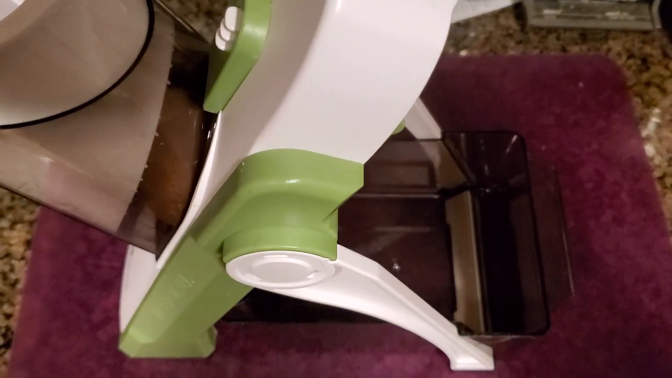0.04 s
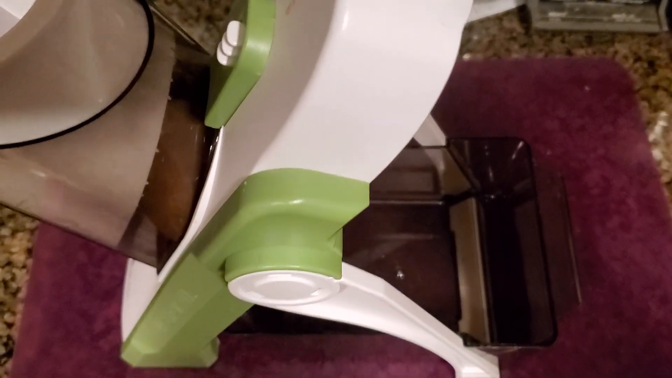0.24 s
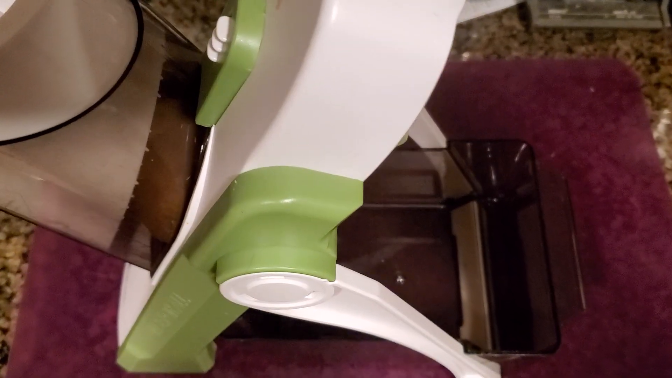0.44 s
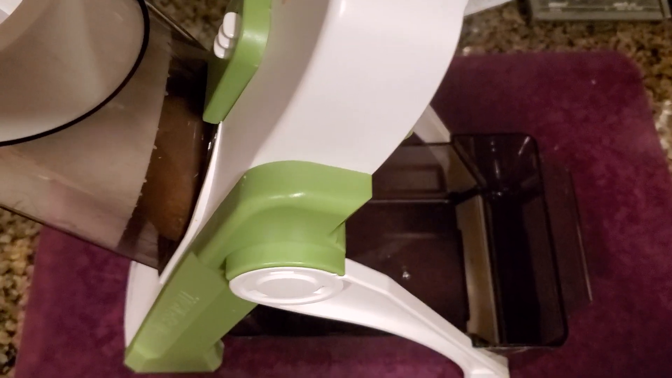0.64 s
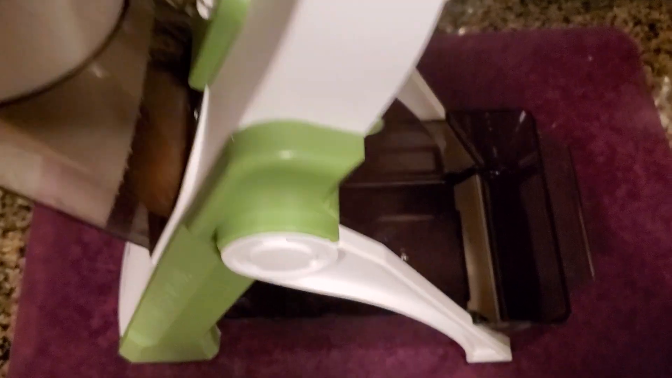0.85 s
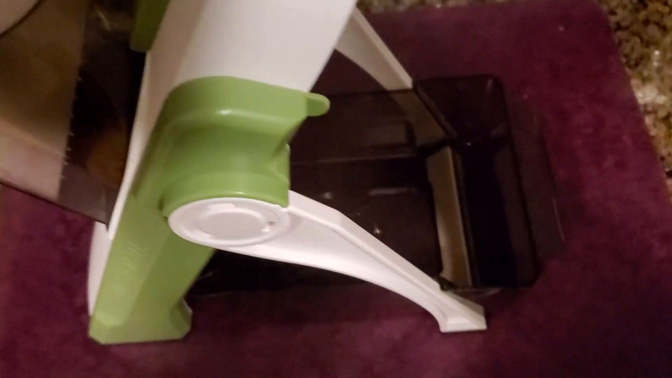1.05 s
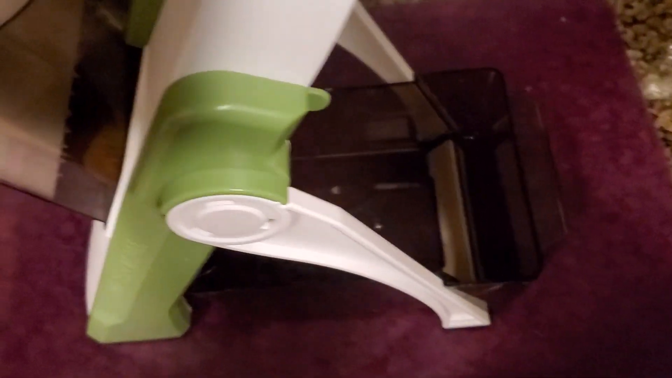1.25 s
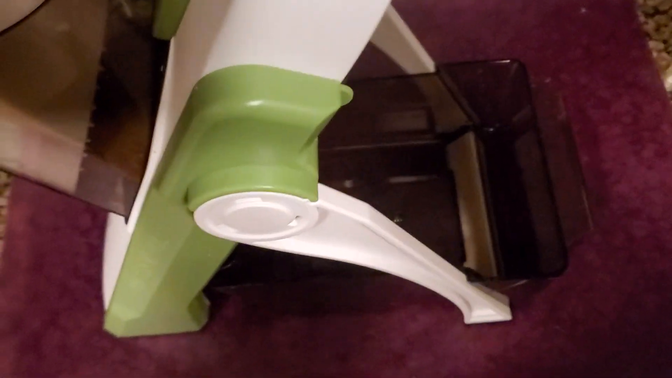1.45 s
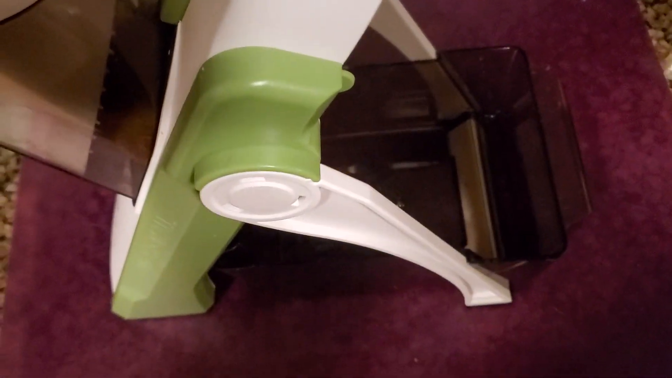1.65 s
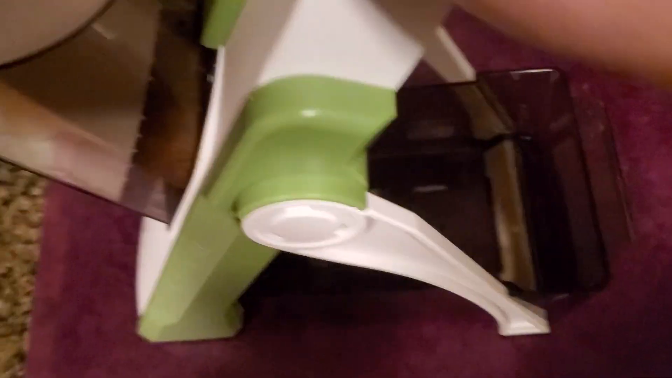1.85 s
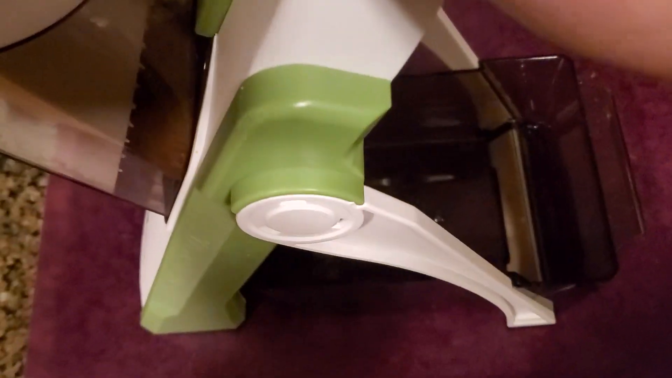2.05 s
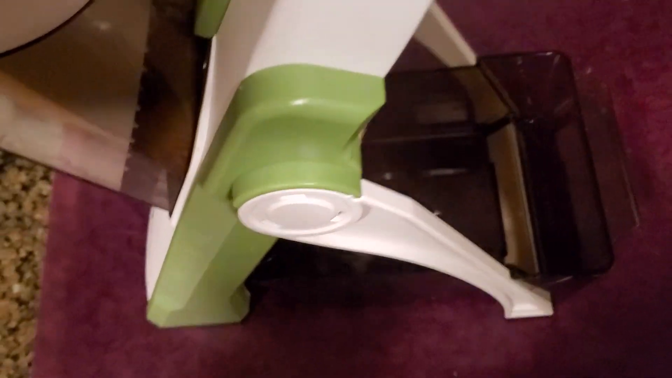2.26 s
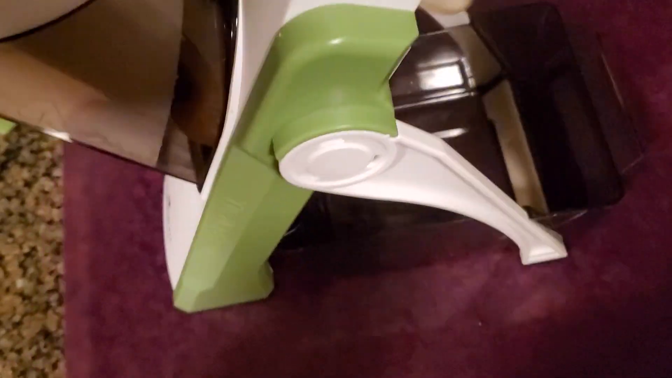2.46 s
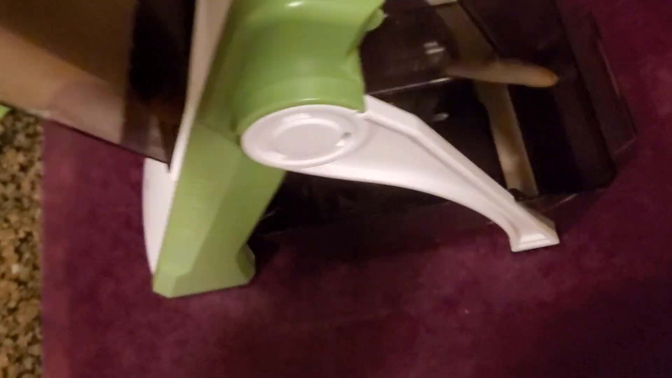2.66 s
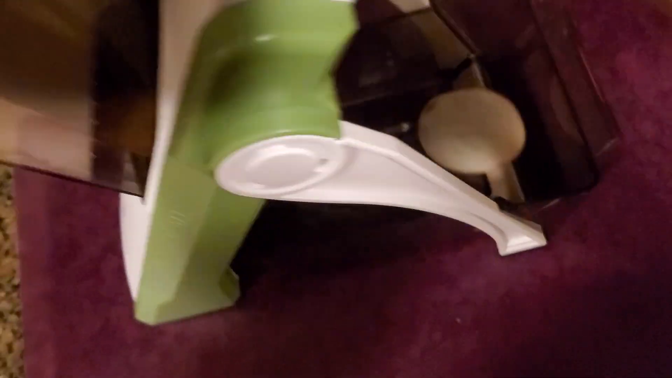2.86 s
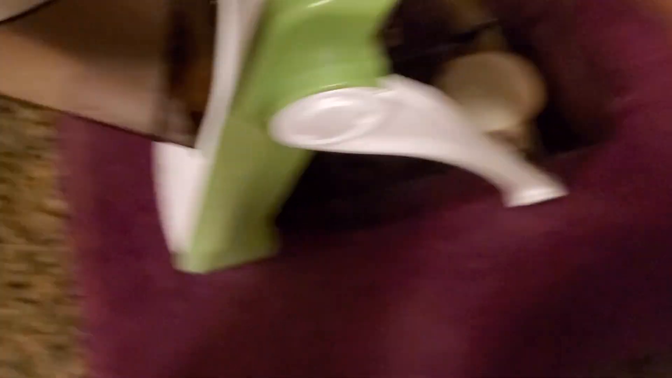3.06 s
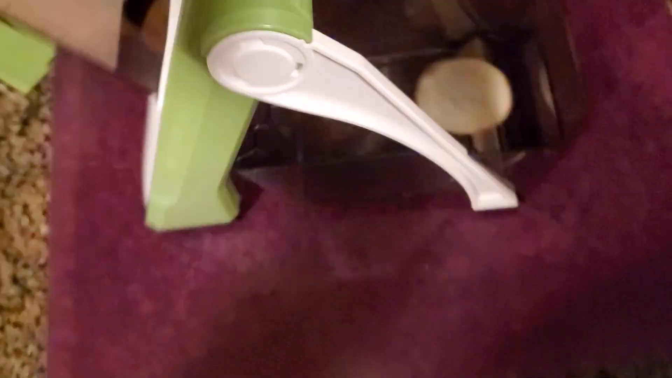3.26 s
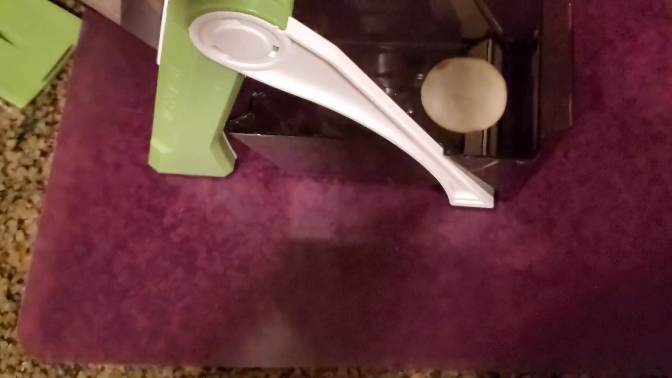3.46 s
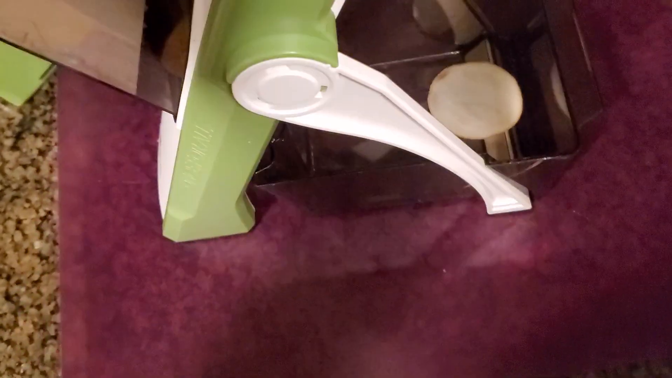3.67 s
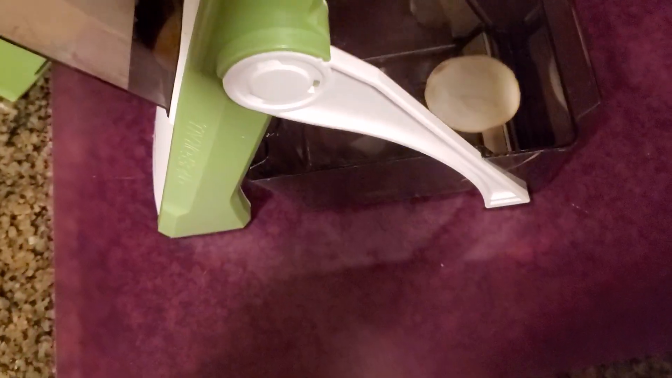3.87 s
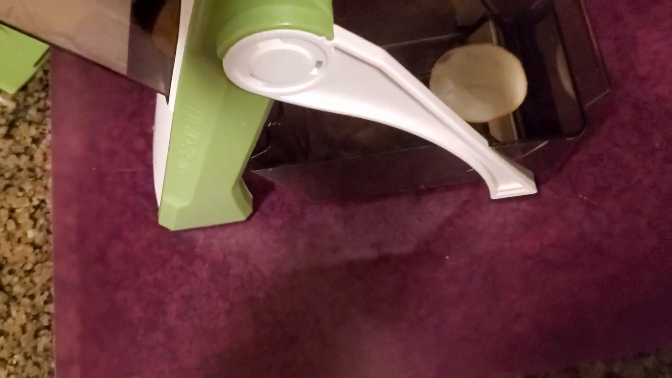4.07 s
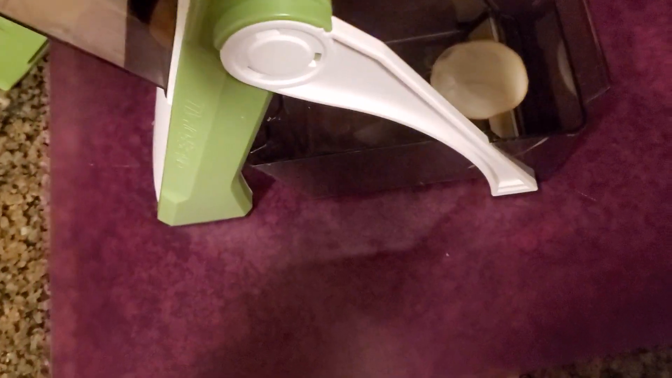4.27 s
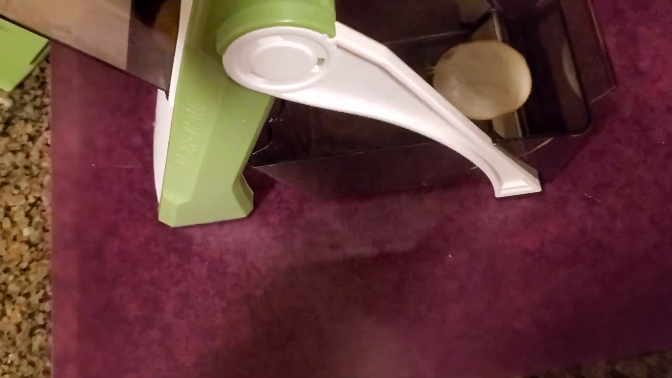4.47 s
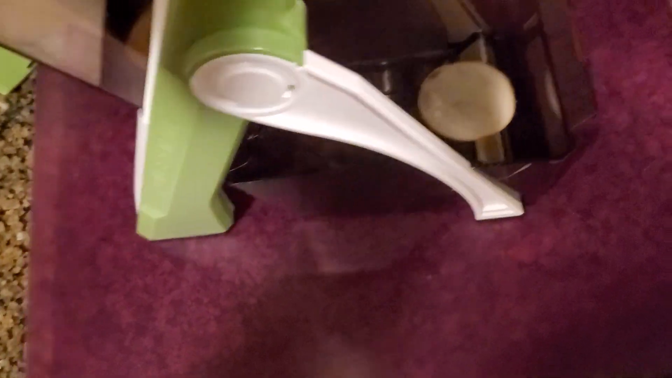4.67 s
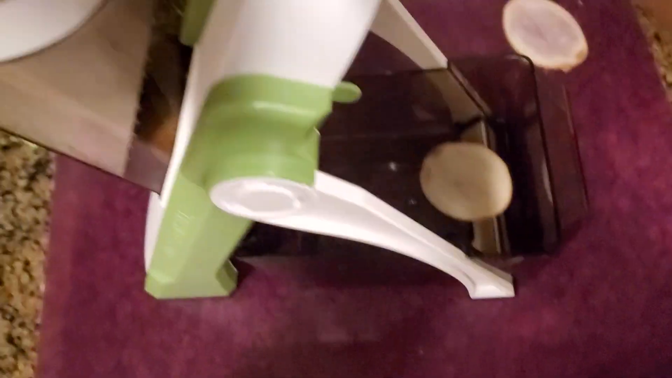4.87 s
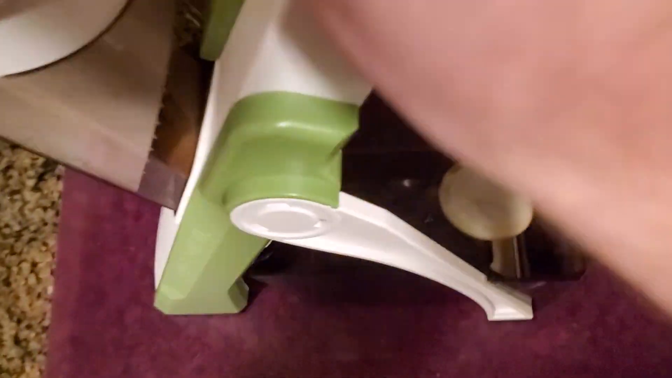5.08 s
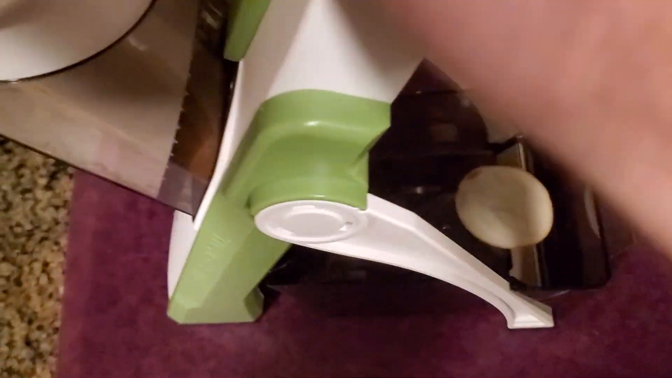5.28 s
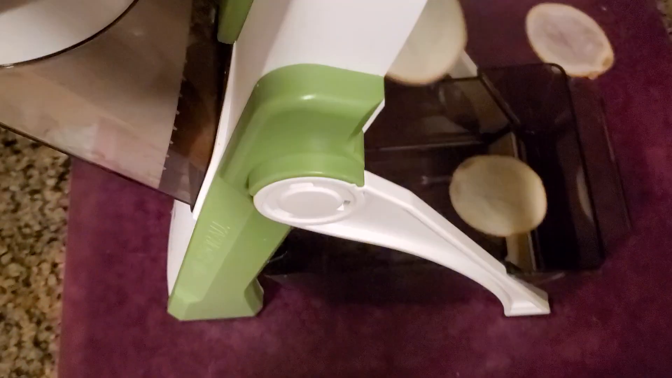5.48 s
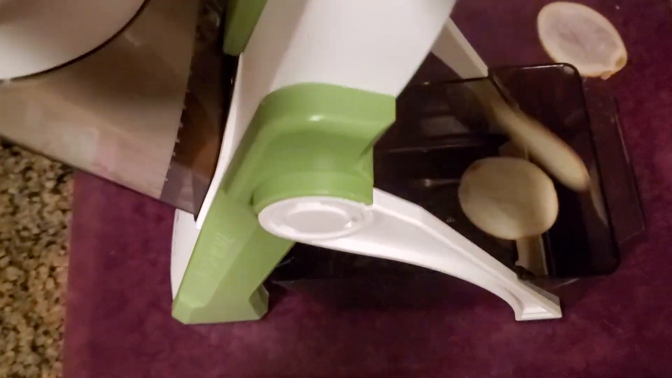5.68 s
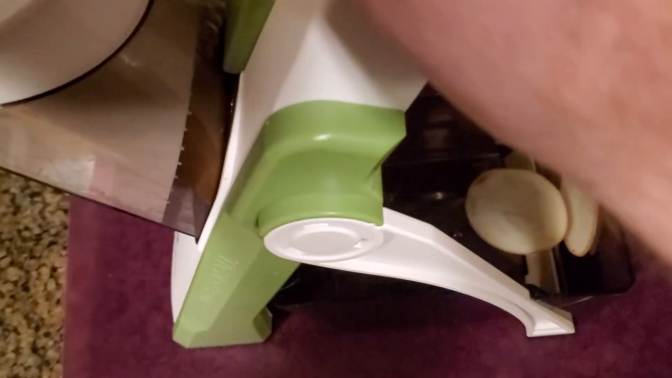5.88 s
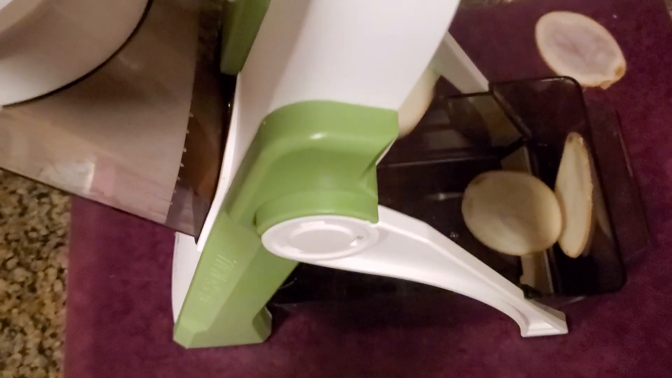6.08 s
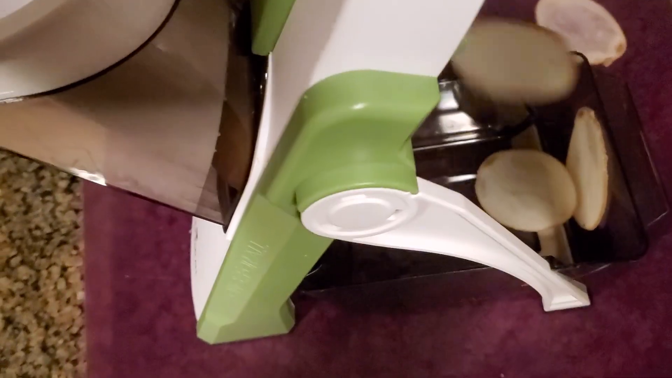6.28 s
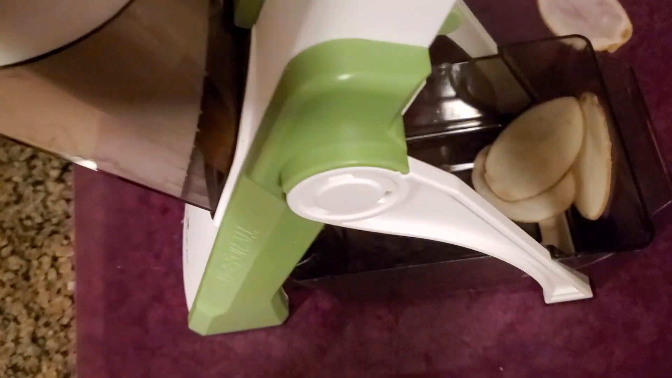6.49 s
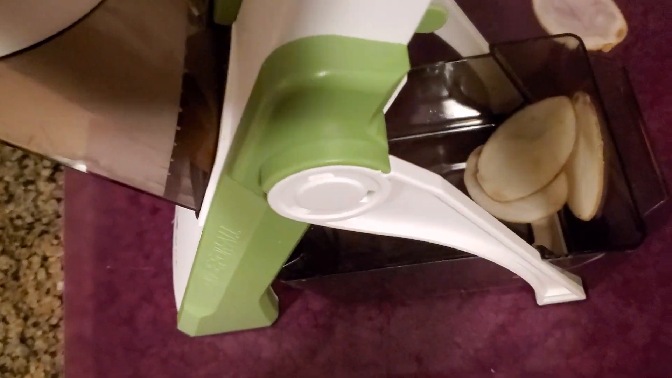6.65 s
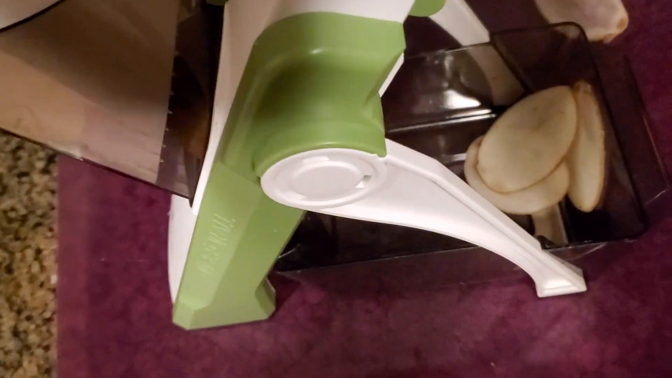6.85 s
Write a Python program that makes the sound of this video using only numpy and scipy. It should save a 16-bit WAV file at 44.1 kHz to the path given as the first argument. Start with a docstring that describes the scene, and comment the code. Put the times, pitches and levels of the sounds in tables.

```python
"""A carriage scrapes along its rails, a blade crunches through potato and parts knock together.
This is a hand-worked plastic slicer on a kitchen counter: blows and rubbing excite decaying modes of its
hollow frame, tray and counter, shaped noise makes scrape and snaps, and a dense echo follows.
Far off a slow engine turns about twelve times a second, two soft low beats a turn, a sum of harmonics;
steady shaped noise is the room air."""
import sys
import numpy as np
from scipy import signal
from scipy.fft import rfft, irfft
from scipy.io import wavfile

SR = 44100
rng = np.random.default_rng(int(sys.argv[2]) if len(sys.argv) > 2 else 0)


def unload_wav(signal):
    """Save mono or channel-first audio to the path in sys.argv[1] as 16-bit WAV at rate SR, clipped to [-1, 1]."""
    wavfile.write(
        sys.argv[1],
        SR,
        np.round(np.clip(np.atleast_2d(signal).T, -1, 1) * 32767).astype(np.int16),
    )


N = 305172   # samples

# Table levels are relative; gains are added where the tables are used.
# Knocks in the frame: start_s [s], hollow_db [dB], hard_above_hollow_db [dB], struck_pitch_hz [Hz]
KNOCKS = [(0.429, -49.5, 0, 1140), (.597, -61, -11, 934), (0.797, -49, -13.5, 1070), (0.999, -43, -23, 770),
          (1.076, -26, -20, 750), (1.082, -44, -17, 790), (1.46, -59.5, -3, 1040), (1.541, -60, -5, 606),
          (1.86, -12.5, -3, 1110), (1.873, -18.5, -5.5, 1000), (1.908, -22, 10, 896),
          (1.917, -13.5, -6, 990), (1.924, -13.5, 1.5, 676), (1.954, -25, -6.5, 816),
          (2.012, -14.5, -8.5, 870), (2.054, -19, -14.5, 904), (2.303, -58, 1.5, 991),
          (2.375, -25.5, -9, 547), (2.503, -11, 0.5, 932), (2.509, -15, -1.5, 799), (2.555, -40, 6.5, 840),
          (2.611, -26.5, -3.5, 640), (2.632, -29, -3.5, 641.4), (2.643, -34.5, 6, 688),
          (2.695, -35, 0.5, 550), (2.748, -34, -4, 810), (2.81, -16, -18.5, 810), (2.817, -23, -12.5, 787),
          (2.84, -43.5, -8.5, 900), (2.918, -13, -2.5, 740), (2.927, -12, 2, 920), (2.967, -11, -10, 614),
          (2.997, -17.5, -12.5, 644), (3.233, -48, -3.5, 760), (3.408, -15, 6.5, 534),
          (3.482, -13.5, -8, 810), (3.505, -26.5, -22.5, 840), (3.591, -28.5, -5.5, 760),
          (3.794, -33.5, -30, 637), (3.892, -52, 1, 1030), (4.364, -16.5, 0, 1235), (4.397, -23, -9, 768),
          (4.664, -34, -1, 795), (4.676, -30.5, -13, 830), (4.948, -55.5, -4, 556),
          (4.988, -58.5, 11, 1095), (5.093, -58, -1.5, 772), (5.178, -19.5, 0, 777),
          (5.195, -23.5, -0.5, 799), (5.215, -24, -8.5, 810), (5.242, -10, -1.5, 774),
          (5.259, -16.5, -23, 600), (5.515, -48, 8.5, 760), (5.546, -36, -3, 730), (5.591, -14.5, 3, 835),
          (5.715, -61.5, 23.5, 1110), (5.828, -15, -8.5, 864), (5.836, -11.5, -12, 823),
          (5.923, -8, -2.5, 790), (5.937, -22.5, -3.5, 583), (6.184, -43, 2.5, 1050),
          (6.265, -15, 6.5, 940), (6.333, -33.5, 8.5, 1090), (6.485, -35, 6.5, 990), (6.812, -80, 2, 1000),
          (6.883, -71.5, 15.5, 958)]
# Slides of the carriage along its rails: start_s [s], length_s [s], first_hiss_db [dB], last_hiss_db [dB],
# fade_db_per_s [dB/s], treble_lift_db [dB]
SLIDES = [(0.416, 0.13, -67, -72, 300, -0.5), (.65, 0.028, -85, -79.5, 200, 4.5),
          (0.947, .05, -57, -51.5, 300, -8), (1.011, 0.17, -48.5, -54, 294, -4.5),
          (1.206, 0.11, -49.5, -52, 400, -1.5), (1.35, 0.058, -67, -70.5, 300, 0),
          (1.547, 0.027, -60, -72.5, 103, -19), (1.871, 0.017, -32.5, -23, 254, -9.5),
          (1.977, 0.055, -36, -37, 182, -10), (2.267, 0.086, -72.5, -68, 306.5, 0.5),
          (2.38, 0.044, -41, -33, 131, -5), (2.48, .12, -47, -42.5, 157.5, -4.5),
          (2.608, .1, -46.5, -42.5, 152, -6.5), (2.76, 0.21, -43, -43, 300, -4.5),
          (2.914, 0.049, -34.5, -19.5, 162, -7), (3.166, 0.32, -57, -41.5, 154, -1.5),
          (3.443, 0.28, -51.5, -51.5, 202, -1.5), (3.773, .02, -47.5, -38.5, 282, -3.5),
          (3.89, 0.17, -63, -61.5, 298, -6.5), (4.013, 0.072, -56, -47, 523, -6),
          (4.257, 0.086, -54.5, -42.5, 160.5, -10.5), (4.587, 0.064, -49.5, -42, 203, -6.5),
          (4.774, 0.13, -62.5, -57.5, 802, 6), (4.962, 0.05, -67, -71, 352, -5),
          (5.178, 0.064, -42.5, -19, 220.5, -9.5), (5.388, 0.13, -63.5, -42, 57, -7.5),
          (5.766, 0.045, -46.5, -42, 604, -6), (5.825, .11, -37, -30, 238, -9),
          (6.034, 0.19, -64, -43.5, 302, -10.5), (6.15, .13, -47.5, -42, 499, -5.5),
          (6.283, 0.081, -55, -43.5, 406, -3.5), (6.47, 0.16, -61, -72, 36.5, -8)]
# Bites of the blade into the potato: deepest_s [s], crunch_db [dB], rumble_db [dB]
BITES = [(.53, -83, -89), (.69, -69, -91), (1.0, -52, -85), (1.07, -58, -60.5), (1.31, -75, -61),
         (1.913, -27.5, -40.5), (2.041, -51.5, -64), (2.168, -66.5, -52), (2.373, -48, -46),
         (2.471, -36, -56), (2.632, -43.5, -44.5), (2.823, -49, -52), (2.95, -22, -42.5),
         (3.005, -25.5, -32), (3.409, -34.5, -51), (3.557, -57.5, -47.5), (3.811, -74, -51.5),
         (3.9, -58.5, -73), (4.38, -41, -81), (4.667, -51.5, -53.5), (4.97, -56, -65.5), (5.253, -31, -33),
         (5.45, -54, -57.5), (5.596, -37.5, -65), (5.84, -39.5, -45), (5.94, -32, -37), (6.245, -42.5, -57),
         (6.36, -54, -75), (6.49, -64, -88)]
# Thin bright snaps with no ring: start_s [s], level_db [dB]
SNAPS = [(0.35, -52.5), (1.21, -50.5), (1.821, -48), (2.151, -68), (2.613, -31.5), (2.967, -19.5),
         (3.483, -30), (3.658, -45), (3.775, -41.5), (4.52, -60), (4.86, -50.5), (5.452, -55.5),
         (5.513, -41.5), (5.926, -29), (6.186, -50), (6.267, -29.5), (6.336, -28.5), (6.54, -33)]
# Weighty blows that carry down: start_s [s], tray_thud_db [dB], counter_thump_db [dB]
THUDS = [(.597, -63, -54), (0.793, -59, -50), (1.076, -65, -42), (1.544, -55, -62), (1.859, -29, -19.5),
         (1.874, -29.5, -39), (1.906, -25, -19), (1.954, -30, -51), (2.008, -54, -30.5), (2.373, -47, -35),
         (2.612, -27, -58), (2.698, -32, -65), (2.808, -35, -29), (2.916, -23.5, -20.5), (2.97, -23, -28),
         (2.999, -33, -24), (3.411, -46, -65), (3.481, -35.5, -27), (3.533, -38, -38), (3.59, -40, -60),
         (3.797, -41, -58), (3.893, -52, -57), (4.362, -37, -37.5), (4.67, -35, -35), (4.949, -51.5, -76),
         (5.178, -33.5, -26), (5.213, -47, -41), (5.242, -21.5, -16), (5.592, -33, -38), (5.829, -44, -21),
         (5.923, -17, -12), (6.263, -38, -43)]
# Modes of the hollow frame: pitch_hz [Hz], level_db [dB], t60_s [s], left_over_right_db [dB]
HOLLOW_MODES = [(524, -8.5, 0.017, -4), (614, 1, 0.13, -2), (656, -8.5, 0.042, 3), (787.5, -1.5, 0.07, 3),
                (873.5, -1, 0.024, 3.5), (906, -2.5, 0.052, -3.5), (1025, -1, 0.037, -3.5)]
# Higher, hard-sounding modes of the frame: pitch_hz [Hz], level_db [dB], t60_s [s], left_over_right_db [dB]
HARD_MODES = [(1150, -2, .025, -4), (1310, -3, .022, -4), (1450, -4, .02, -3), (1580, -3, .022, 0),
              (1780, -6, .016, 0), (2010, -4, .016, 1), (2170, 0, .022, 2), (2400, -3, .016, 1),
              (2650, -5, .014, 1), (2980, -5, .013, 2), (3340, -8, .012, 3), (3750, -9, .011, 3),
              (4200, -9, .011, 3), (4650, -10, .011, 3)]
# Modes of the tray: pitch_hz [Hz], level_db [dB], t60_s [s], left_over_right_db [dB]
TRAY_MODES = [(187.4, 3.5, 0.037, -1.5), (230, -4.5, 0.099, 2.5), (310.3, 4.5, 0.034, -3),
              (389, 0, 0.057, -11), (510, 8, 0.012, -10)]
# Modes of the counter: pitch_hz [Hz], level_db [dB], t60_s [s], left_over_right_db [dB]
COUNTER_MODES = [(64, 0, .17, -2.3), (80, -4, .1, -2.3), (98, -4, .09, -2.3), (114, -3, .09, -2.3),
                 (140, -7, .06, -2.3)]
# Spectrum of the scrape: frequency_hz [Hz], density_db [dB per Hz]
SCRAPE_SPECTRUM = [(180, -38), (300, -15), (398, -10.5), (612, -8.5), (676, -18.5), (785, -4.5),
                   (1290, -11), (1990, -9), (2390, -3.5), (3990, -10.5), (6560, -3), (8990, -16),
                   (11300, -11), (15800, -6.5)]
# Rotation of the engine: time_s [s], turns_completed [turns]
ENGINE_TURNS = [(-.004, 0), (.487, 6), (.879, 11), (1.284, 16), (1.768, 22), (2.737, 34), (3.842, 48),
                (4.246, 53), (4.565, 57), (4.973, 62), (6.421, 80), (6.984, 87)]
# Engine orders: multiple_of_turn_rate [whole number], level_db [dB]
ENGINE_ORDERS = [(3, -86), (4, -65), (5, -62.5), (6, -61), (7, -59), (8, -55), (9, -59), (10, -68.5),
                 (11, -77), (12, -82), (13, -90.5), (14, -92.5), (15, -91), (16, -83.5)]
# Spectrum of the room air: frequency_hz [Hz], density_db [dB per Hz]
AIR_SPECTRUM = [(15, -40.5), (25, -13), (102, -1), (126, -1.5), (161, -20.5), (269, -25.5), (414, -25.5),
                (620, -45), (857, -26), (1060, -42.5), (6490, -44), (8970, -65), (12100, -43.5),
                (15800, -35)]

# decay constants of the contact push, in seconds
HOLLOW_S, HARD_S, CRACK_S, SNAP_S, THUD_S, THUMP_S = 0.0037, 0.0031, 0.0047, 0.0057, 0.0095, 0.0135
SLIDE_RISE_DB_PER_S, BITE_RISE_DB_PER_S = 801, 445
CRUNCH_FADE_DB_PER_S, RUMBLE_FADE_DB_PER_S = 259.5, 164.5
REST_DB = -82.5   # what the parts give off when nothing moves
TREBLE_HZ, CRACK_TOP_HZ = 2320, 6950
KNOCK_CRACK_DB, CRACK_DB_PER_DB = -1, 0.6   # crack against the hard ring; soft knocks crack less
LEFT_LAG = 11   # samples
ECHO_LOW_HZ = 1390   # cupboards soak up the hollow ring
KITCHEN_T60_S, EXTRA_TREBLE_T60_S, WALL_CUT_HZ = 0.28, 0.17, 4000   # treble undergoes both decays
EARLY_BEAT_TURNS, EARLY_BEAT_DB = 0.24, -5   # a weaker opposite beat ahead of the main one
AIR_DB = -59.5
CUTOFF_HZ = 15800


def frame():
    """Modal excitation: knocks and cutting friction set the lightly damped frame ringing."""
    start_s, hollow_db, harder_db, struck_hz = np.transpose(KNOCKS)
    crunch_db = crunch_level()
    crunch = from_db(crunch_db + 5.3 * drift(62)) * grains(770, 4.9)
    rasp_db = 0.57 * hiss_level() + 0.42 * crunch_db + 0.83 * drift(40)
    rasp = from_db(rasp_db) * grains(1500, 1.4)
    hollow_push = blows(start_s, hollow_db + 7.5, HOLLOW_S)
    hard_push = blows(start_s, hollow_db + harder_db + 1.5, HARD_S)
    hollow = body(HOLLOW_MODES, hollow_push, from_db(-26) * crunch, 5.7, struck_hz)
    hard = body(HARD_MODES, hard_push, from_db(-24) * rasp, 3.2)
    return hollow + hard


def rails():
    """Frictional noise: many small slips make the scrape; one burst of the same colour is a crack."""
    friction = 0.6 * grains(9000, 1.3) + 0.8 * rng.standard_normal((2, N))
    scale = 1 / np.std(coloured(friction, SCRAPE_SPECTRUM))
    ticks = 0.55 * grains(300, 3.0)   # small random ticks within the scrape
    hiss_db = hiss_level()
    hiss = patchy(from_db(hiss_db + 1.5 * drift(40) + 1.5) * (friction + ticks), 2.3)
    treble = filtered(hiss, 2, TREBLE_HZ, "high")
    # the minus sign joins the opposed phases of the two filters
    scrape = filtered(hiss, 2, TREBLE_HZ) - from_db(treble_level() - hiss_db) * treble
    start_s, hollow_db, harder_db, _ = np.transpose(KNOCKS)
    crack_db = hollow_db + harder_db + KNOCK_CRACK_DB + CRACK_DB_PER_DB * hollow_db
    snap_s, snap_db = np.transpose(SNAPS)
    bursts = blows(start_s, crack_db, CRACK_S) + blows(snap_s, snap_db, SNAP_S)
    cracks = filtered(from_db(29.5) * bursts * friction, 1, CRACK_TOP_HZ)
    return scale * coloured(scrape + cracks, SCRAPE_SPECTRUM)


def tray_and_counter():
    """Structure-borne sound: weighty blows and cutting rumble excite the low modes underneath."""
    start_s, thud_db, thump_db = np.transpose(THUDS)
    rumble_rows = [(s, 0, db, db, RUMBLE_FADE_DB_PER_S) for s, _, db in BITES]
    rumble = from_db(swells(rumble_rows, BITE_RISE_DB_PER_S)) * grains(400, 3.3)
    low = body(TRAY_MODES, blows(start_s, thud_db - 3, THUD_S), from_db(-26.5) * rumble, 0.52)
    low += body(COUNTER_MODES, blows(start_s, thump_db + 0.5, THUMP_S), from_db(-29) * rumble, 1.5)
    return filtered(low, 4, 52, "high")   # the rubber feet pass no deep bass


def hiss_level():
    """Sliding friction: hiss level in dB follows the slides of the carriage."""
    return swells([row[:-1] for row in SLIDES], SLIDE_RISE_DB_PER_S)


def treble_level():
    """Spectral tilt: each slide lifts or lowers its treble against its hiss."""
    rows = [(s, length, first + lift, last + lift, fade) for s, length, first, last, fade, lift in SLIDES]
    return swells(rows, SLIDE_RISE_DB_PER_S)


def crunch_level():
    """Fracture: crunch level in dB rises to the deepest point of each bite and then fades."""
    rows = [(s, 0, db, db, CRUNCH_FADE_DB_PER_S) for s, db, _ in BITES]
    return swells(rows, BITE_RISE_DB_PER_S)


def body(modes, push, rubbing, patchy_db, struck_hz=None):
    """Modal superposition: knocks and rubbing drive modes, each with its own balance and sign at the sides."""
    out = 0
    knock_at = (np.array(KNOCKS)[:, 0] * SR).astype(int)
    latest = np.maximum(np.searchsorted(knock_at, np.arange(N), "right") - 1, 0)
    for k, (hz, mode_db, t60, balance_db) in enumerate(modes):
        force = push * rng.standard_normal(N)
        if struck_hz is not None:   # the spot struck favours the modes near its pitch
            loss_db = np.minimum(30 * np.abs(np.log2(hz / struck_hz)), 15)
            force = force * from_db(-loss_db)[latest]
        force = force + rubbing * from_db(patchy_db * drift(14.0))   # rubbing wanders from mode to mode
        flip = -1 if k % 2 and hz > 500 else 1
        gains = sides(balance_db) * [1, flip]
        out = out + from_db(mode_db) * gains[:, None] * ring(force, hz, t60)
    return out


def ring(force, hz, t60):
    """Damped resonance: a unit click sets a decaying sine of height 1 ringing."""
    r, w = from_db(-60 / (t60 * SR)), 2 * np.pi * hz / SR
    return signal.lfilter([0, np.sin(w)], [1, -2 * r * np.cos(w), r * r], force + 1e-18)


def blows(times, level_db, contact_s):
    """Contact impulse: each push swells in a moment, dies exponentially and has its energy set by level."""
    push, t = np.zeros(N + SR), np.arange(SR // 10) / SR / contact_s
    shape = (1 - np.exp(-4.0 * t)) * np.exp(-t)
    shape = shape / np.sqrt(np.sum(shape ** 2))
    for s, db in zip(times, level_db):
        at = int(s * SR)
        push[at:at + len(t)] += from_db(db) * shape
    return push[:N]


def swells(rows, rise_db_per_s):
    """Power addition: each (start, length, first dB, last dB, fade) rises, runs its length and fades."""
    t = np.arange(0, N + 64, 64) / SR
    power = from_db(2 * REST_DB)   # doubled dB turns an amplitude gain into power
    for start, length, first_db, last_db, fade in rows:
        level_db = np.interp(t, [start, start + max(length, 1e-4)], [first_db, last_db])
        level_db = level_db - rise_db_per_s * np.maximum(start - t, 0)
        level_db = level_db - fade * np.maximum(t - start - length, 0)
        power = power + from_db(2 * level_db)
    return np.interp(np.arange(N) / SR, t, 10 * np.log10(power))


def grains(per_s, spread_db):
    """Stick-slip as shot noise: random clicks of uneven size and sign, scaled to rms 1."""
    sizes = from_db(spread_db * np.minimum(rng.exponential(1, N), 5)) * rng.choice([-1, 1], N)
    return rms_one(sizes * (rng.random(N) < per_s / SR))


def patchy(x, patchy_db):
    """Band modulation: each band swells and sinks on its own, with alternating sign."""
    edges = [300, 1200, 2000, 3200, 5000, 8000, 12000, 18000]   # Hz
    out = 0
    for k, band in enumerate(zip(edges, edges[1:])):
        out = out + (-1) ** k * from_db(patchy_db * drift(7.5)) * filtered(x, 2, band, "band")
    return out


def kitchen(x):
    """Diffuse reverberation: convolution with noise that dies away, treble sooner, its own on each side."""
    t = np.arange(SR // 2) / SR
    white = rng.standard_normal((2, len(t)))
    dull = filtered(white, 1, WALL_CUT_HZ)
    echo = dull + (white - dull) * from_db(-60 * t / EXTRA_TREBLE_T60_S)
    echo = echo * from_db(-60 * t / KITCHEN_T60_S) * np.minimum(t / 0.0016, 1)   # 1.6 ms build-up
    return signal.fftconvolve(x, echo / np.sqrt(np.sum(echo ** 2) / 2), axes=1)[:, :N]


def engine(spread=0.14, waver_db=0.5):
    """Fourier synthesis: orders nearly in step make two beats a turn, spread a little in time by the path."""
    time_s, turns = np.transpose(ENGINE_TURNS)
    turn = np.interp(np.arange(N) / SR, time_s, turns)
    out = 0
    for k, db in ENGINE_ORDERS:
        angle = 2 * np.pi * k * turn + spread * (k - 8) ** 2
        early = from_db(EARLY_BEAT_DB) * np.cos(angle + 2 * np.pi * k * EARLY_BEAT_TURNS)
        out = out + from_db(db + waver_db * drift(4.3)) * (early - np.cos(angle))
    return out * sides(-0.5)[:, None]


def room_air():
    """Spatial coherence: long waves reach both sides alike, short ones are independent noise."""
    own = filtered(rng.standard_normal((2, N)), 2, 200, "high")
    shared = filtered(rng.standard_normal(N), 2, 200)
    return from_db(AIR_DB) * rms_one(coloured(own + shared, AIR_SPECTRUM))


def coloured(white, spectrum):
    """Spectral shaping: noise is weighted by levels interpolated over log frequency."""
    hz = np.maximum(np.fft.rfftfreq(N, 1 / SR), 1)
    point_hz, point_db = np.transpose(spectrum)
    gain = from_db(np.interp(np.log(hz), np.log(point_hz), point_db))
    return irfft(rfft(white) * gain, N)


def drift(rate):
    """Low-passed chance: a slow random curve of spread 1, with its rate in Hz."""
    r = np.exp(-80 * np.pi * rate / SR)   # one step is 40 samples
    slow = signal.lfilter([1], [1, -2 * r, r * r], rng.standard_normal(N // 40 + 2002))[2000:]
    return np.interp(np.arange(N) / 40, np.arange(len(slow)), rms_one(slow))


def filtered(x, order, hz, kind="low"):
    """Maximally flat filtering: a Butterworth response."""
    return signal.sosfilt(signal.butter(order, hz, kind, fs=SR, output="sos"), x)


def sides(balance_db):
    """Level difference: left and right gains split the balance evenly."""
    return from_db(np.multiply.outer([.5, -.5], balance_db))


def rms_one(x):
    """Normalisation: scales a signal to rms 1."""
    return x / np.sqrt(np.mean(x ** 2) + 1e-20)


def from_db(db):
    """Decibel law: amplitude gain of a level."""
    return 10 ** (np.asarray(db) / 20)


def scene():
    """Superposition: slicer near the right side, its echo, the thuds and theirs, the engine and room air."""
    near = filtered(frame() + rails(), 2, 330, "high")   # the small frame radiates no bass
    near[0] = np.roll(near[0], LEFT_LAG)
    near_echo = from_db(-10.5) * kitchen(filtered(near, 1, ECHO_LOW_HZ, "high"))
    low = tray_and_counter()
    low_echo = from_db(-16.0) * kitchen(low)
    return near + near_echo + low + low_echo + engine() + room_air()


def record(dry):
    """Saturation and band limiting: peaks are rounded, the top is cut."""
    rounded = np.tanh(dry)
    return signal.sosfilt(signal.ellip(12, .5, 90, CUTOFF_HZ, fs=SR, output="sos"), rounded)


dry = scene()
out = record(dry)
unload_wav(out)
```